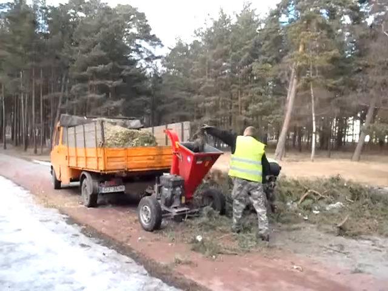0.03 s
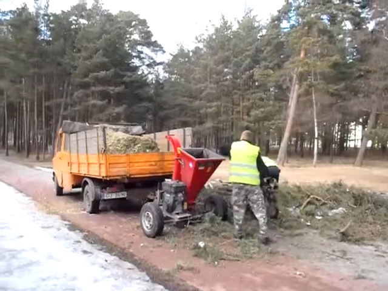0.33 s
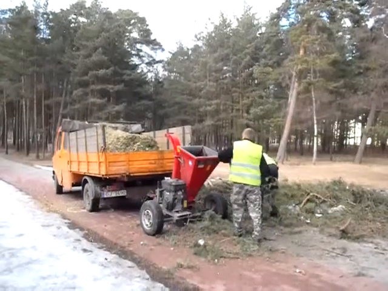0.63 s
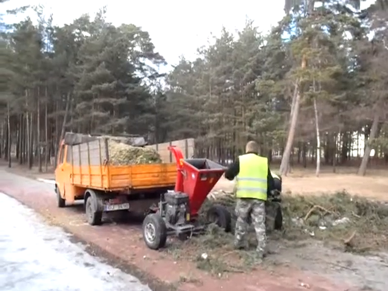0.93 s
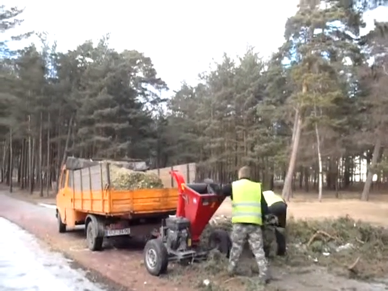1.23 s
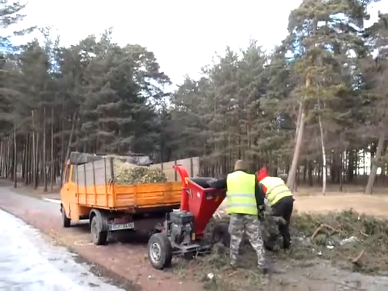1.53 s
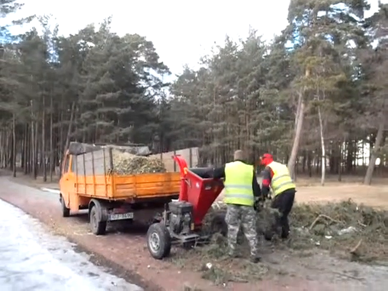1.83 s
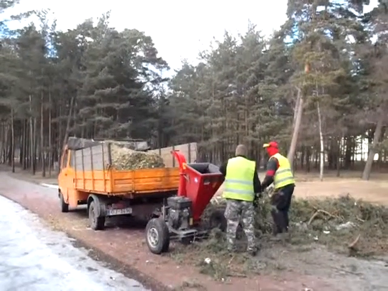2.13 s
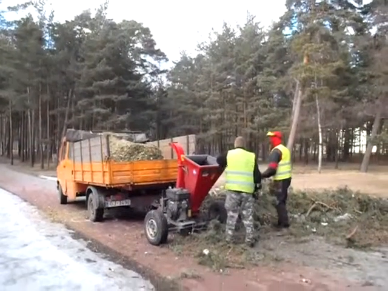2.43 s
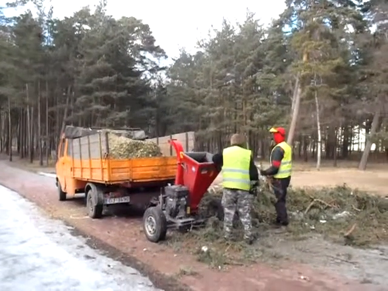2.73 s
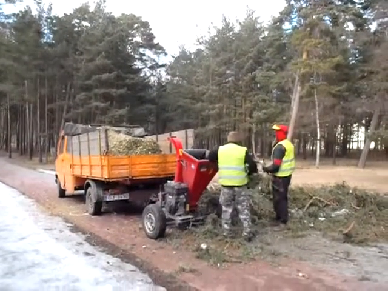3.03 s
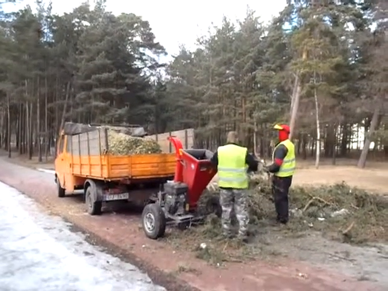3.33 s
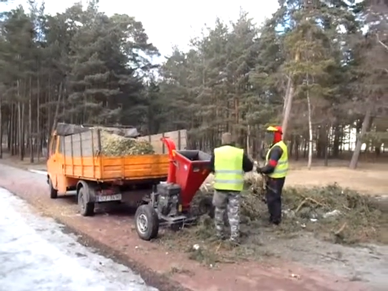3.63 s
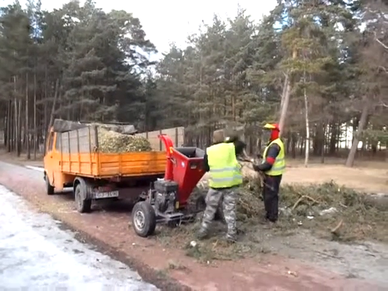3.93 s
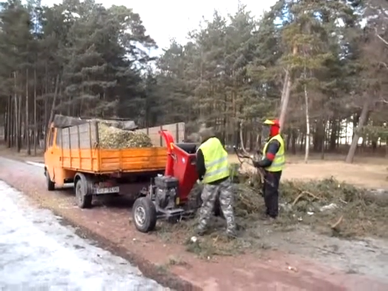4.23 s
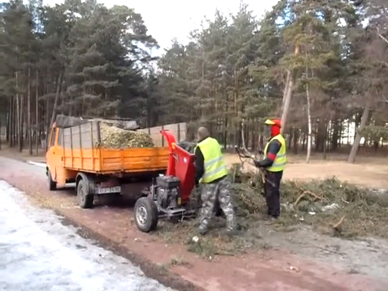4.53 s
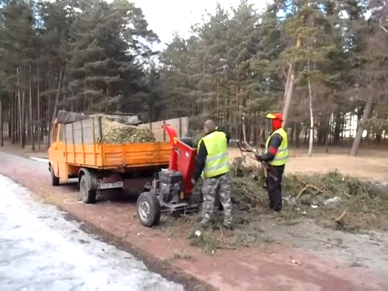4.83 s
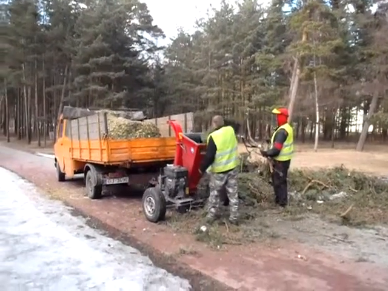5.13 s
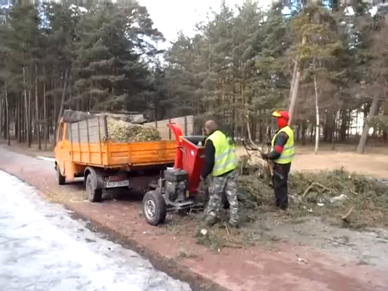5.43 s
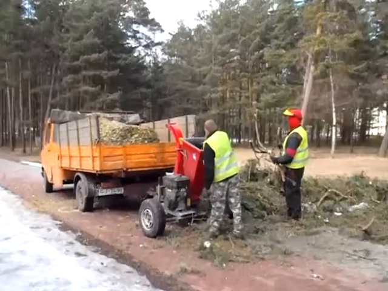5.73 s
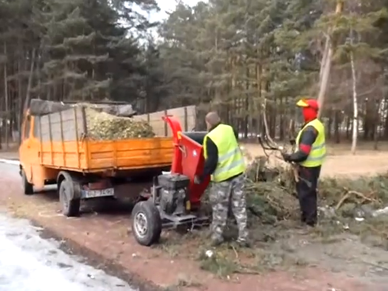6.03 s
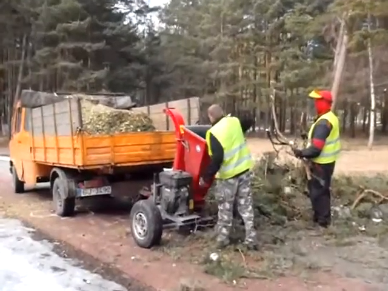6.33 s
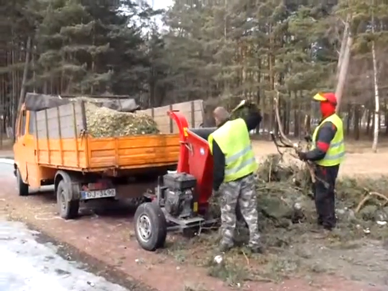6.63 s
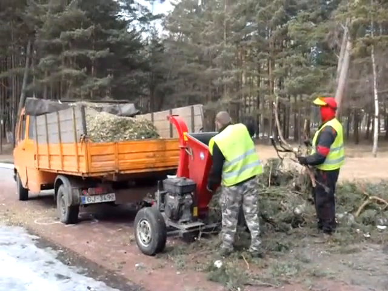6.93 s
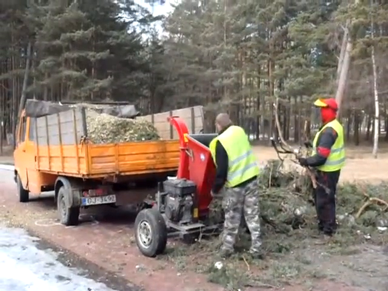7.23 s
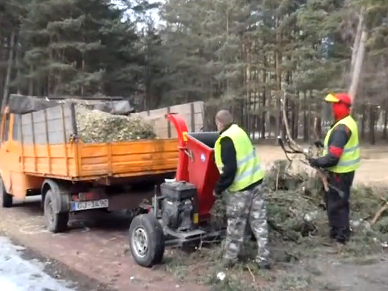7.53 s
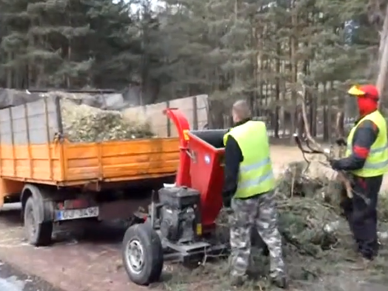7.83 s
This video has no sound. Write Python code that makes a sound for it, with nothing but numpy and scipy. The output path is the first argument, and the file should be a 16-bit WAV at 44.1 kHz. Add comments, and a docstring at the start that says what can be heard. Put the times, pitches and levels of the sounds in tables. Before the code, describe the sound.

A petrol wood chipper throbs and clatters steadily outdoors, twice chopping a branch with a brief rasp and snap.

```python
"""Wood chipper on a forest track

A petrol engine with one cylinder throbs and clatters, and its belt turns a humming knife rotor.
Twice the knives chop a branch: the wood rasps and snaps, the engine slows, and the gain control of a
small camera a few metres away turns the sound down. Chips rattle up the chute, wood knocks on the
hopper (the feed funnel), and light wind nudges the microphone."""
import sys
import numpy as np
from scipy import signal
from scipy.fft import rfft, irfft, next_fast_len
from scipy.io import wavfile
from scipy.ndimage import uniform_filter1d, map_coordinates

SR = 44100
rng = np.random.default_rng(int(sys.argv[2]) if len(sys.argv) > 2 else 0)


def persist_wave(psi):
    """Save psi, clipped to +-1, as 16-bit WAV."""
    counts = np.round(np.clip(psi, -1, 1) * 32767).astype(np.int16)
    wavfile.write(sys.argv[1], SR, np.atleast_2d(counts).T)


N = 356328
TIME = np.arange(N) / SR


# The tones of the exhaust note: multiple of the firing rate, level/dB
EXHAUST_TONES = [(2, -52.3), (3, -54.7), (4, -55.8), (5, -37.2), (6, -34.0), (7, -41.3), (8, -55.4),
                 (9, -37.4), (10, -39.3), (11, -53.4), (12, -50.9), (13, -54.6), (14, -59.0), (15, -56.1)]
# The colour of gas rushing through the muffler: f/Hz, level/dB
RUSH_SPECTRUM = [(15, -28.5), (45, -13), (100, -9.5), (170, -3.5), (250, 1.5), (330, -1.5), (420, -4.5),
                 (560, -8.5), (690, -8), (800, -19.5), (1500, -27.5), (4000, -70.5)]
# How loud that rush is over time: t/s, level/dB
RUSH_LOUDNESS = [(0, -39), (.9, -34.5), (2.2, -37.5), (6.2, -37.5), (7.3, -35.5)]

def exhaust(turns, throttle, uneven=0.073, flutter=0.045, throb=0.23, labour_db=-48, note_db=1.2):
    """Each firing pushes out a puff, no two equally strong: a low note and a pulsing rush of gas."""
    strength = 1 + uneven * wander(30)
    puff = 1 + throb * np.cos(2 * np.pi * (turns - .6))
    rush = amp(np.interp(TIME, *np.transpose(RUSH_LOUDNESS))) * noise(RUSH_SPECTRUM, puff)
    # An open throttle deepens the note.
    labour = amp(labour_db) * throttle * tones(turns, [(2, -7.5), (3, -3.0), (4, -21.0)], flutter)
    note = amp(note_db) * tones(turns, EXHAUST_TONES, flutter)
    return strength * (note + labour + rush)


# The colour of rattling valve gear and sheet metal: f/Hz, level/dB
CLATTER_SPECTRUM = [(300, -55.5), (800, -6.5), (1000, -2.5), (1250, -0.5), (1520, -0.5), (1850, -3.5),
                    (2150, -4.5), (2500, -1.5), (2800, -4.5), (3100, 0), (3350, 1.5), (3750, -1.5),
                    (6000, -2.5), (14000, -9.5)]
# The tones of the engine casing: multiple of the firing rate, level/dB
CASING_TONES = [(32, -54.5), (42, -52.2), (45, -49.3), (48, -53.8), (49, -55.0), (50, -55.1), (51, -54.8),
                (56, -53.6), (58, -54.0), (59, -53.8), (66, -53.6), (67, -54.7), (69, -50.6)]
# The whine of the timing gears: multiple of the firing rate, level/dB
GEAR_WHINE = [(36, -46.7)]

def clatter(turns, locked_db=-37, loose_db=-30, tap_cycles=0.018, play=0.0011, stroke=0.21, count=18):
    """Valves and piston tap at the same points in every engine cycle; loose panels rattle in step."""
    angle = np.arange(1024) / 1024  # one cycle, from 0 to 1
    offset, size = rng.random((2, count))
    place = (np.arange(count) + offset) / count
    since_tap = (angle[:, None] - place) % 1
    taps = np.sqrt(1 + (2 * size ** 2 * np.exp(-since_tap / tap_cycles)).sum(1))
    crank = turns + play * wander(90)  # slack in the parts smears the high tones
    ring = taps * rng.standard_normal(len(angle))
    locked = map_coordinates(ring, [crank % 1 * len(angle)], order=3, mode="grid-wrap")  # ring, looped
    # The panels shake with each firing and each turn of the crank.
    shake = 1 + stroke * (np.cos(2 * np.pi * turns) + np.cos(2 * np.pi * 2 * turns)) / 2
    rattle = shake * np.interp(crank, angle, taps, period=1) * amp(wander(150))
    tapping = amp(locked_db) * unit(colour(locked, CLATTER_SPECTRUM))
    panels = amp(loose_db) * noise(CLATTER_SPECTRUM, rattle)
    metal = amp(.5 * wander(10)) * (tapping + panels)
    return metal + tones(turns, CASING_TONES, flutter=0.41) + tones(turns, GEAR_WHINE, flutter=0.087)


# The tones of the knife rotor and its fan: multiple of the rotor speed, level/dB
ROTOR_TONES = [(1, -52.8), (2, -49.2), (3, -41.3), (4, -33.3), (5, -49.2), (6, -46.1), (7, -48.3),
               (8, -51.2), (9, -44.2), (10, -44.8)]

def rotor_hum(rotor_turns, lost_speed, free_db=1.5, choking=28, fill_s=0.5):
    """The rotor and its fan hum, more softly while the chips of a heavy cut choke the fan."""
    keep = np.exp(-1 / (fill_s * SR))
    fill = signal.lfilter([1 - keep], [1, -keep], lost_speed) ** 2
    return amp(free_db - choking * fill) * tones(rotor_turns, ROTOR_TONES, flutter=0.064)


# The colour of knives rasping through wood: f/Hz, level/dB
RASP_SPECTRUM = [(400, -2), (1200, -11), (2600, -17), (3100, 7.5), (3600, 7.5), (5000, 5), (7000, 2.5),
                 (14000, -17)]
# The colour of the booming hopper: f/Hz, level/dB
BOOM_SPECTRUM = [(200, -7), (450, -5.5), (850, -7.5), (1250, -0.5), (1700, 2), (2400, -1.5), (3500, -2),
                 (8000, -8)]
# The colour of the bright crackle as the loud chop overloads the camera: f/Hz, level/dB
OVERLOAD_CRACKLE_SPECTRUM = [(3000, -22.5), (6000, -20), (7500, -12), (8500, -5), (11000, 1),
                             (14000, -18.5)]
# The branches fed in: t/s, length/s, drop in firing rate/Hz, level/dB,
# then, compared with that level: boom/dB, steel ring/dB, extra rasp while splitting/dB
BRANCHES = [(.914, 0.1697, .44, -16, 1, -8.5, 1.5), (7.382, .29, 1.4, -13.5, -1.5, -13, 2)]

def chopping(rotor_turns, bite=0.1, grain_db=1.4, crackle_db=8.5, crackles_per_s=900):
    """Two knives bite on each turn: wood rasps, with a bright crackle; the hopper booms, steel rings."""
    dig_in_s, thinning_db_per_s, clear_s = 0.098, 36, .028
    boom_build_s, split_at_s, split_s = .11, 0.045, 0.022
    bites = (1 + bite * np.cos(2 * np.pi * 2 * rotor_turns)) * amp(grain_db * wander(250))
    rasp, boom = noise(RASP_SPECTRUM, bites), noise(BOOM_SPECTRUM, bites)
    steel = unit(housing(bites * rng.standard_normal(N)))
    clicks = rng.random(N) < crackles_per_s / SR
    crackle = amp(crackle_db) * noise(OVERLOAD_CRACKLE_SPECTRUM, bites * clicks)
    out = np.zeros(N)
    for start, length, _, db, boom_db, steel_db, rasp_db in BRANCHES:
        age = np.maximum(TIME - start, 0)
        clearing = np.exp(-np.maximum(age - length, 0) / clear_s)  # the last piece leaves the knives
        level = np.minimum(age / dig_in_s, 1) * amp(db - thinning_db_per_s * age) * clearing
        booming = amp(boom_db) * np.minimum(age / boom_build_s, 1)
        splitting = np.exp(-((age - split_at_s) / split_s) ** 2)
        wood = amp(rasp_db * splitting) * rasp
        out += level * (wood + booming * boom + amp(steel_db) * steel + splitting * crackle)
    return out


def speed_sag(recovery_s=.55):
    """Cutting slows the engine; then the governor, its speed keeper, wins the speed back."""
    lost_speed = np.zeros(N)
    for start, length, drop_hz, *_ in BRANCHES:
        slowing = np.sin(np.pi / 2 * np.clip((TIME - start) / length, 0, 1))
        since_cut = np.maximum(TIME - start - length, 0)
        lost_speed += drop_hz * slowing * np.exp(-since_cut / recovery_s)
    return lost_speed


# The sharp snaps of breaking wood: t/s, level/dB
WOOD_SNAPS = [(.959, 0.5), (.967, -1.5), (.972, 1), (.978, -5), (.988, -4), (.996, 7), (1.001, 2),
              (1.012, 0), (7.43, -10), (7.447, -3), (7.454, -2)]

def snaps(tear_s=0.00066, ring_db=-3):
    """Bundles of fibres tear with short, bright cracks, and each crack rings the knife housing."""
    keep = np.exp(-1 / (tear_s * SR))
    fades = signal.lfilter([1], [1, -keep], impulses(WOOD_SNAPS) + 1e-18)
    tears = fades * rng.standard_normal(N)
    return colour(tears, OVERLOAD_CRACKLE_SPECTRUM) + amp(ring_db) * housing(tears)


# The pitches at which the knife housing rings: f/Hz, width/Hz, level/dB
HOUSING_RINGS = [(1270, 95, 8), (2300, 130, 5), (2450, 58, 5.5), (3600, 210, 2), (3540, 140, -24.5),
                 (3663, 39, 13)]

def housing(x):
    """The steel around the knives rings with whatever strikes it."""
    return sum(amp(db) * signal.lfilter(*signal.iirpeak(hz, hz / width, fs=SR), x)
               for hz, width, db in HOUSING_RINGS)


# The colour of the chute: f/Hz, level/dB
CHUTE_SPECTRUM = [(600, -16), (1200, -3), (1600, 1), (2400, -8), (3300, -1), (3800, -4), (14000, -8.5)]
# The flurries of chips: t/s, half-length/s, level/dB
CHIP_FLURRIES = [(1.32, 0.066, -36), (1.54, 0.28, -32), (1.97, 0.055, -33.5), (2.76, .08, -33),
                 (3.15, 0.12, -44), (3.5, 0.13, -49), (4.07, .02, -33), (7.525, 0.027, -20),
                 (7.645, 0.0055, -20.5), (7.692, 0.0055, -21)]

def chips(grain_db=2):
    """Loose chips rattle as they are flung along the steel chute."""
    return noise(CHUTE_SPECTRUM, amp(grain_db * wander(400))) * swells(CHIP_FLURRIES)


# The knocks of wood on the hopper: t/s, level/dB
WOOD_KNOCKS = [(4.865, -27), (5.585, -35), (5.965, -24), (6.19, -25)]
# The pitches at which the hopper rings: f/Hz, level/dB, time to fade by 60 decibels/s
HOPPER_RINGS = [(556, -7, .05), (750, -8, .05), (854, -4, 0.092), (880, -2, 0.03), (1200, -5, .04)]

def knocks():
    """Branch ends bump the hopper, which rings briefly."""
    t = np.arange(SR // 4) / SR
    ring = sum(amp(db - 60 * t / fade_s) * np.sin(2 * np.pi * hz * t) for hz, db, fade_s in HOPPER_RINGS)
    return signal.oaconvolve(impulses(WOOD_KNOCKS), ring / 2)[:N]


# The colour of the wind's rumble: f/Hz, level/dB
WIND_SPECTRUM = [(15, -4), (40, -6), (100, -8), (200, 2), (500, -34), (2000, -63)]
# The puffs of wind: t/s, half-length/s, level/dB
WIND_PUFFS = [(2.14, 0.029, -35), (4.73, 0.14, -39), (4.84, 0.047, -34), (5.31, 0.038, -40),
              (5.39, 0.024, -37)]

def wind():
    """Puffs of air hit the microphone and make short, low rumbles."""
    return noise(WIND_SPECTRUM) * swells(WIND_PUFFS)


def amp(db):
    """Turns decibels into a number to multiply by."""
    return 10 ** (np.asarray(db) / 20)


def unit(x):
    """Scales x to an average (rms) size of 1."""
    return x / np.sqrt(np.mean(x ** 2) + 1e-20)


def colour(x, points):
    """Makes each frequency in x louder or softer, following rows of f/Hz, level/dB."""
    hz, db = np.transpose(points)
    size = next_fast_len(N + 4096)
    bins = np.fft.rfftfreq(size, 1 / SR)
    gain = amp(np.interp(np.log(bins + 1), np.log(hz), db))
    return irfft(rfft(x, size) * gain, size)[:N]


def noise(points, gate=1):
    """Noise of average size 1, shaped in time by gate and coloured by points."""
    return unit(colour(gate * rng.standard_normal(N), points))


def wander(rate):
    """A smooth random wobble of average size 1, with about `rate` new values a second."""
    return unit(map_coordinates(rng.standard_normal(8192), [TIME * rate], order=2, mode="wrap"))


def tones(turns, rows, flutter, lag=.265):
    """The wavering tones of a turning shaft; higher ones lag, so each pulse rings out."""
    return sum(amp(db) * (1 + flutter * wander(15)) * np.cos(2 * np.pi * round(k) * turns - lag * k ** 2)
               for k, db in rows)


def impulses(rows):
    """One click for each row of t/s, level/dB."""
    out = np.zeros(N)
    for s, db in rows:
        out[round(s * SR)] = amp(db)
    return out


def swells(rows):
    """A smooth rise and fall for each row of t/s, half-length/s, level/dB."""
    return sum(amp(db) * np.exp(-((TIME - s) / half_length) ** 2) for s, half_length, db in rows)


# The speed that the governor aims for: t/s, firing rate/Hz
TARGET_SPEED = [(0, 29.86), (2.3, 29.955), (4.3, 29.91), (5.6, 29.816), (6.4, 29.846)]

def scene(belt_ratio=2.2474):
    """Adds up all the sounds; one engine speed drives the whole machine."""
    lost_speed = speed_sag()
    throttle = np.tanh(lost_speed)  # the governor opens it as the engine slows
    firing_hz = np.interp(TIME, *np.transpose(TARGET_SPEED)) - lost_speed
    turns = np.cumsum(firing_hz) / SR  # engine cycles so far, one per firing
    rotor_turns = belt_ratio * turns  # the rotor's 4th tone beats slowly against the engine's 9th
    running = rotor_hum(rotor_turns, lost_speed) + exhaust(turns, throttle) + clatter(turns)
    return (running + chopping(rotor_turns) + chips() + knocks() + wind() + snaps())[None]


def gain_control(x, threshold_db=-30.5, fall_db_per_s=160, rise_db_per_s=105, react_s=0.025, hold_s=0.044):
    """Loud treble turns the sound down, a moment late; after a short hold it climbs back."""
    hop = 128  # samples per step
    treble = signal.sosfilt(signal.butter(2, 900, "highpass", fs=SR, output="sos"), x)
    power = abs(uniform_filter1d(treble ** 2, size=800))[::hop]
    excess_db = np.maximum(10 * np.log10(power + 1e-12) - threshold_db, 0)
    t = TIME[::hop]
    delayed = [np.interp(t - late, t, excess_db) for late in np.linspace(react_s, hold_s, 10)]
    cut_db = [0]
    for wanted in np.max(delayed, axis=0)[1:]:
        least = cut_db[-1] - rise_db_per_s * hop / SR
        most = cut_db[-1] + fall_db_per_s * hop / SR
        cut_db.append(min(max(wanted, least), most))
    return x / amp(np.interp(TIME, t, cut_db))


# How the microphone unevenly dulls the treble: f/Hz, level/dB
MIC_RESPONSE = [(3700, 2.5), (4000, -5.5), (4300, -13.5), (4900, -7), (5250, -12), (5600, -20), (6200, -17),
                (7200, -29), (7800, -29.5), (8200, -36), (9500, -34), (11500, -41.5), (14000, -43)]

def record(dry, top_hz=14200):
    """The camera colours the sound, turns loud moments down and cuts off the highest treble."""
    heard = gain_control(colour(dry[0], MIC_RESPONSE))
    lowpass = signal.firwin(511, top_hz, window=("kaiser", 9), fs=SR)
    return signal.oaconvolve(heard, lowpass, "same")[None]


dry = scene()
out = record(dry)
persist_wave(out)
```